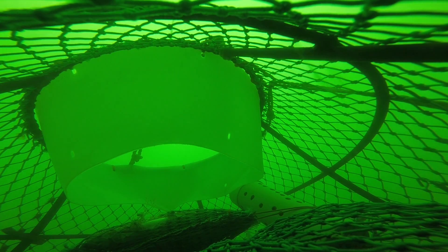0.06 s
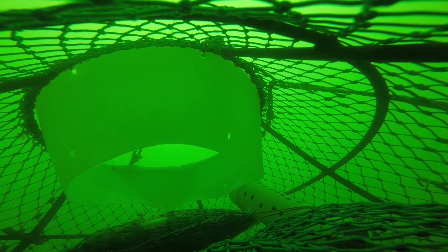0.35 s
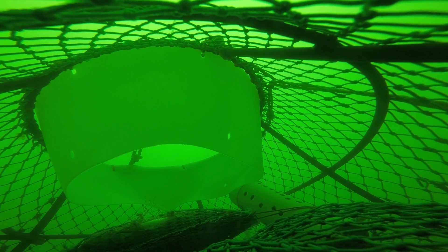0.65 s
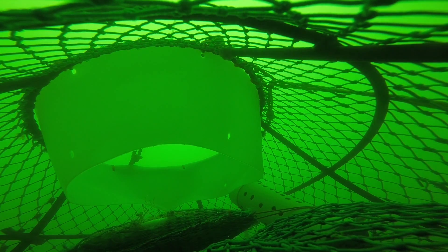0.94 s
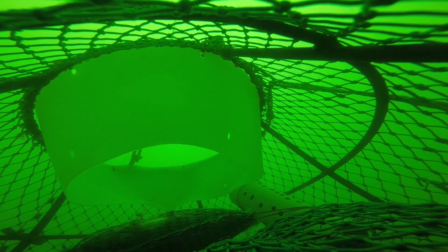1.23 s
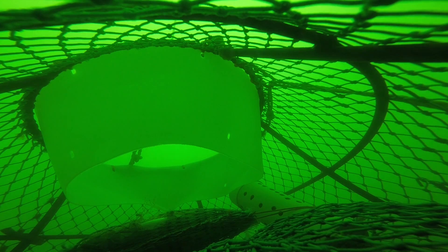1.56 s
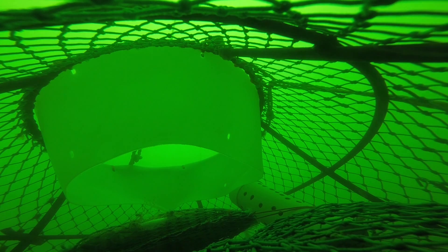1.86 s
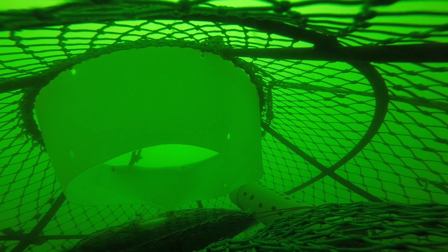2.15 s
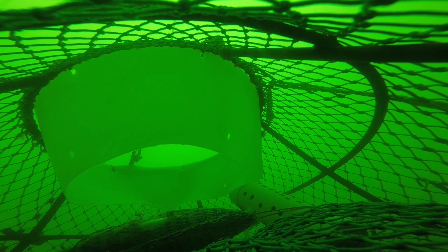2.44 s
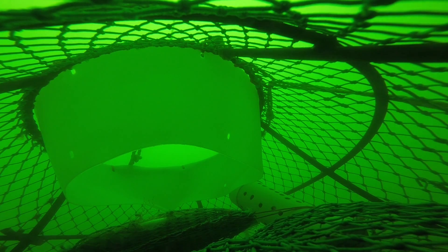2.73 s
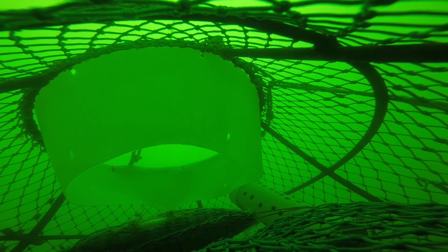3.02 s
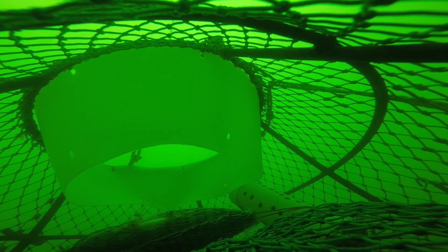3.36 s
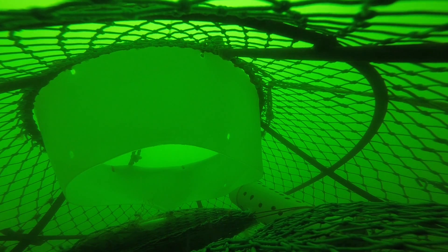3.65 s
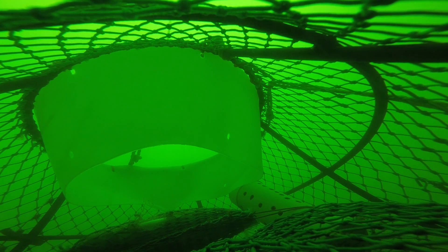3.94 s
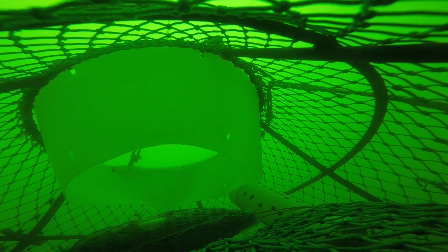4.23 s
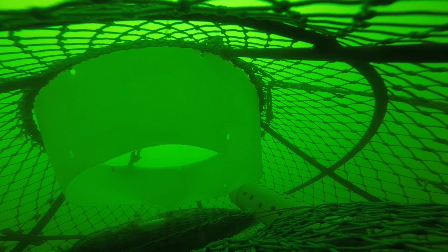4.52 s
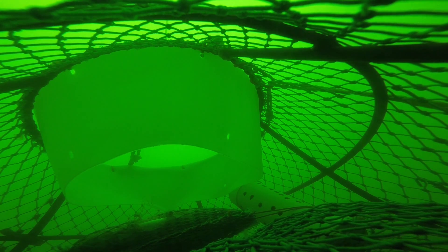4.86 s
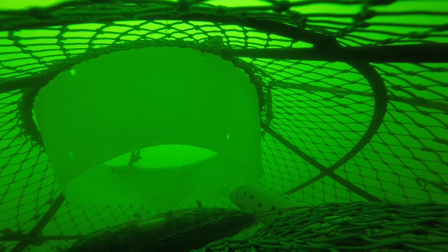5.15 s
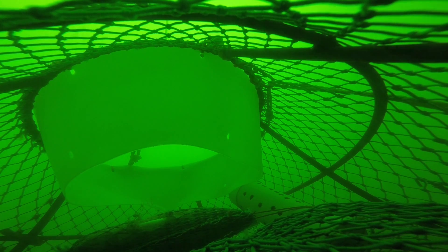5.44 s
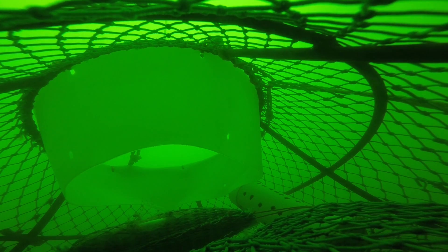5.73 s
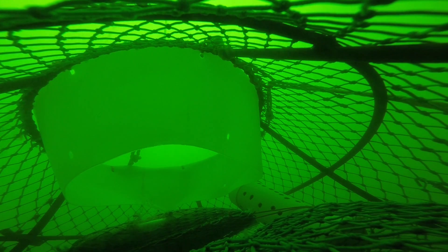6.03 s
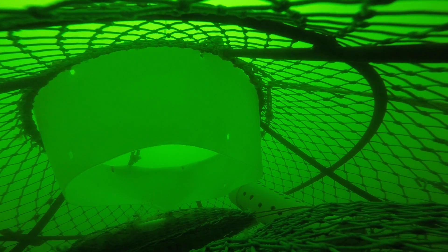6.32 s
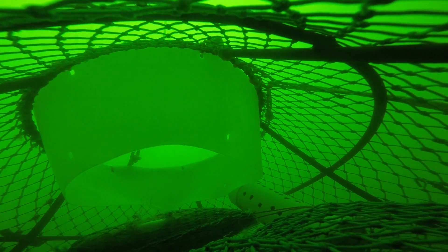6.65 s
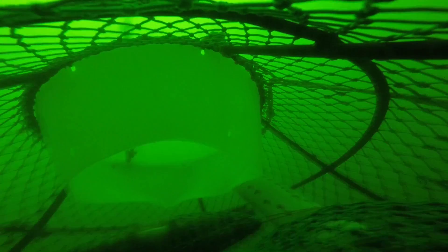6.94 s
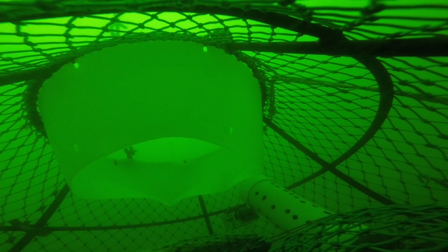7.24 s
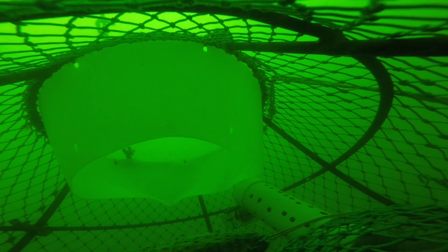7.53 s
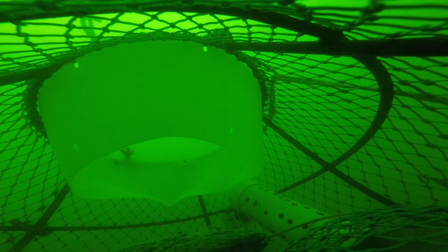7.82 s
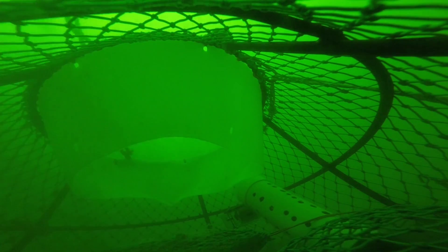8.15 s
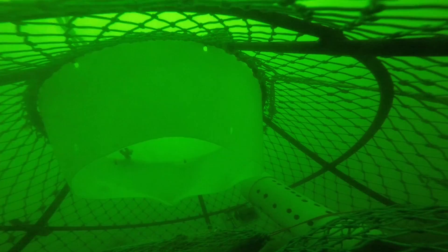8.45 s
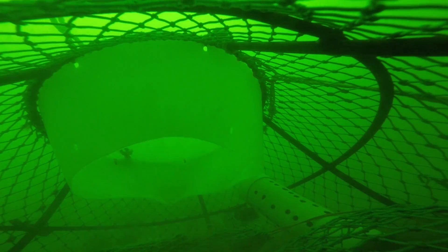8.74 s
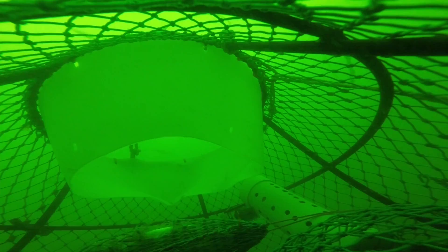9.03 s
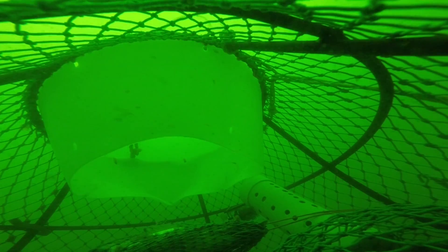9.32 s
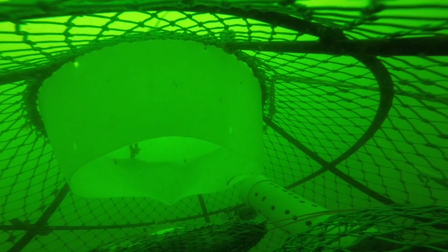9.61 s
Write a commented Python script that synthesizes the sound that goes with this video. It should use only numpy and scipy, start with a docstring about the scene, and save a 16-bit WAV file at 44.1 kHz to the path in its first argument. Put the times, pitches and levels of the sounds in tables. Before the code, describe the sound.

A boat engine idles underwater with a rapid knocking rattle, until a fish trap jolts with scrapes and thumps, leaving dull churning.

```python
"""An idling boat engine knocks twice a shaft turn, heard under water from inside a fish trap.
Its slack drive strikes and rebounds, and dispersion in shallow water draws each knock into a short
falling chirp. Beneath lie the throb of the shaft, machinery drones, hull rumble and propeller wash.
Near 7 s the trap jolts: its mesh scrapes, squeaks and snaps taut, and blows ring the frame.
The knocking stops, and a dull churning runs on until the sound cuts off."""
import sys
import numpy as np
from scipy import signal
from scipy.fft import rfft, irfft, next_fast_len
from scipy.io import wavfile

SR = 44100
rng = np.random.default_rng(int(sys.argv[2]) if len(sys.argv) > 2 else 0)


def transcribe(u):
    """Save the signal u as a 16-bit wav file named by the first command-line argument.

    u: samples, shape (n,) or (channels, n), limited to [-1, 1]; the rate is SR.
    q: integer samples, one column per channel.
    """
    v = np.clip(np.atleast_2d(u).T, -1, 1)
    q = np.round(v * 32767).astype(np.int16)
    wavfile.write(sys.argv[1], SR, q)


N = 426888
TIME = np.arange(N) / SR


def gain_of(db):
    """The decibel law: amplitude grows tenfold every 20 dB."""
    return 10 ** (np.asarray(db) / 20)


def unit_rms(x):
    """Normalisation to an rms of 1."""
    return x / np.sqrt(np.mean(x ** 2) + 1e-20)


def spectrum(points, hz):
    """Interpolation of levels on a logarithmic frequency axis."""
    f, db = np.transpose(points)
    return np.interp(np.log(hz + 1), np.log(f + 1), db)


def ripple(bands, hz):
    """Lorentzian peaks and dips, summed in dB."""
    return sum(db / (1 + (2 * (hz - f) / width) ** 2) for f, width, db in bands)


def follow(rows, t):
    """Linear interpolation in time of each column of a table."""
    s, *columns = np.transpose(rows)
    return [np.interp(t, s, column) for column in columns]


def add(mix, s, sound):
    """Superposition of a sound starting at time s."""
    part = mix[max(0, round(s * SR)):][:len(sound)]
    part += sound[:len(part)]


def coloured(x, colour, bands=()):
    """Spectral shaping by a broad envelope and narrow bands, at rms 1."""
    size = next_fast_len(len(x), True)
    grid = np.linspace(0, SR / 2, 8193)
    gain = gain_of(spectrum(colour, grid) + ripple(bands, grid))
    shaped = rfft(x, size) * np.interp(np.fft.rfftfreq(size, 1 / SR), grid, gain)
    return unit_rms(irfft(shaped, size)[:len(x)])


def wander(hz, t=TIME):
    """Random modulation of rms 1, with hz new values a second."""
    return unit_rms(np.interp(t * hz, np.arange(4096), rng.standard_normal(4096)))


def rough_noise(depth_db, hz, t=TIME):
    """White noise under random amplitude modulation."""
    return rng.standard_normal(len(t)) * gain_of(depth_db * wander(hz, t))


def resonate(x, hz, width_hz):
    """A resonance of unit gain whose centre follows the curve hz."""
    carrier = np.exp(2j * np.pi * np.cumsum(hz) / SR)
    pole = np.exp(-np.pi * width_hz / SR)
    return 2 * (carrier * signal.lfilter([1 - pole], [1, -pole], x / carrier)).real


def minimum_phase(db):
    """The Hilbert relation gives the causal response with this gain."""
    log_gain = np.log(gain_of(np.r_[db, db[-2:0:-1]]))
    return np.exp(np.conj(signal.hilbert(log_gain)))[:len(db)]


# Churning before and after the jolt: t/s, rumble level/dB, wash level/dB
CHURN = [(0, -31.5, -40), (1.3, -30, -39), (2.8, -28.5, -35.5), (4, -29, -40.5), (5, -29.5, -40),
         (5.6, -27.5, -39), (6.8, -29, -38)]
CHURN_AFTER = [(7.25, -36.5, -43), (7.36, -42.5, -41.5), (7.5, -34, -39), (7.75, -31.5, -34),
               (8.3, -32, -34.5), (8.94, -33.5, -36.5)]
# Spectra of hull rumble and propeller wash, before and after: f/Hz, level/dB
RUMBLE = [(10, -20.5), (32, -4.5), (47, -7.5), (62, -24), (90, -7.5), (150, -2.5), (215, 0), (270, -1.5),
          (330, -7.5), (470, -8), (600, -11.5), (1000, -15), (2000, -56)]
RUMBLE_AFTER = [(10, -17), (40, -13.5), (85, -15.5), (130, 0.5), (200, -5), (280, -0.5), (340, -10),
                (550, -12.5), (750, -20.5), (1000, -18), (2000, -52)]
WASH = [(500, -7.5), (1100, -3.5), (1430, 1.5), (1900, -3.5), (2300, -3.5), (2800, -25.5), (3700, -23),
        (5200, -25), (6600, -23.5), (8300, -37.5), (14500, -48), (16000, -74.5)]
WASH_AFTER = [(500, -11.5), (1250, -6), (1480, 4.5), (1600, 0.5), (1665, -15.5), (1790, 0.5), (2600, -14),
              (3700, -16.5), (5300, -24.5), (6700, -21.5), (8200, -29.5), (10000, -40), (14700, -46.5),
              (16000, -83)]
# Resonances and dead bands of a camera housing in the trap: f/Hz, width/Hz, gain/dB
HOUSING = [(1500, 77, 5.5), (1531, 130, -12.5), (2070, 100, -2), (2475, 161, 7.5), (2541, 235, -23.5),
           (2574, 178, 15.5), (3240, 130, -2), (3480, 340, 8), (3850, 300, -2.5), (4920, 180, -5),
           (7250, 400, -8.5), (10950, 340, -5), (12300, 600, -11.5)]
# Hollows in the wash once the trap has settled: f/Hz, width/Hz, gain/dB
HOLLOWS = [(3240, 150, -5.5), (3670, 300, 2.5), (4140, 130, -2.5), (5330, 220, -6.5), (8050, 400, -4),
           (13600, 900, -2), (16050, 1530, -16)]

def churning(curve, rumble, wash, bands, rumble_db, wash_db, grain_db=3.5):
    """Modulated noise: the hull radiates engine rumble and the propeller stirs up bubbles."""
    low_db, high_db = follow(curve, TIME)
    hull = coloured(rough_noise(depth_db=3.03, hz=60), rumble)
    flutter_db = 1.1 * wander(90)
    noise = rng.standard_normal(N)
    spikes_db = grain_db * np.minimum(rng.exponential(1, N), 6)
    bubbles = coloured(noise * gain_of(spikes_db + flutter_db), wash, bands)
    return gain_of(low_db + rumble_db) * hull + gain_of(high_db + wash_db) * bubbles


# Climbing interference notches, one table each: t/s, f/Hz, depth (0-1)
NOTCHES = [
    [(0, 665, 0.15), (1, 910, 1), (2, 1100, 0.7), (2.6, 1310, 0.3)],
    [(1.8, 440, 0), (2.7, 554, 0.46), (3.5, 750, 0.75), (4.5, 1090, 0.9), (5.5, 1210, 0.2)],
]
# Centre of the engine's boom: t/s, f/Hz
BOOM = [(0, 220), (1.5, 233), (3, 241), (4, 174), (6.8, 192)]

def shallows(x, boom_gain=0.66):
    """Multipath interference: as the boat moves, the water cancels some bands and lifts a low one."""
    for rows in NOTCHES:
        hz, depth = follow(rows, TIME)
        x = x - np.clip(depth, 0, 1) * resonate(x, hz, width_hz=220)
    return x + boom_gain * resonate(x, follow(BOOM, TIME)[0], width_hz=70)


def swell(level_db=-38):
    """Forced resonance: propeller wash rises and falls in two modes of the trap."""
    envelope = np.interp(TIME, [3.5, 3.95, 4.3, 4.7], [0.27, 1, 1, 0.26])
    response = [(700, -42), (1200, -16.5), (1450, 8.5), (1680, -10), (1950, 2), (2200, -12.5),
                (2800, -34), (6000, -37)]  # f/Hz, level/dB
    return gain_of(level_db) * envelope * coloured(rough_noise(depth_db=2, hz=60), response)


# Machinery tones before and after the jolt: f/Hz, relative level/dB
DRONE = [(114, -1.5), (151, 3), (352, -8), (470, -6.5), (479, -10.5), (550, -12.5)]
DRONE_AFTER = [(115, -3.5), (167, -0.5), (203, 4), (270, -1), (532, -10.5), (862, -9)]

def drone(lines, curve, level_db, waver, flutter_db=3):
    """A line spectrum: machinery tones waver by a share of their pitch and follow the rumble's level."""
    t, tones = TIME[::8], 0
    for hz, db in lines:
        amplitude = gain_of(db + flutter_db * wander(10, t))
        cycles = np.cumsum(hz * (1 + waver * wander(20, t))) * t[1]
        tones += amplitude * np.sin(2 * np.pi * cycles)
    return gain_of(level_db + follow(curve, TIME)[0]) * np.interp(TIME, t, tones)


# Engine orders: multiple of the shaft speed, relative level/dB
ORDERS = [(1, -4.5), (2, -0.5), (3, 1.5), (4, -13.5), (5, -5), (6, -3), (7, 3.5), (8, 4.5), (9, 2),
          (10, -2)]

def throb(turns, level_db=-13):
    """Harmonics of the shaft's rotation, each wavering in amplitude and phase."""
    t, harmonics = TIME[::8], 0
    for order, db in ORDERS:
        amplitude = gain_of(db) * (1 + .3 * wander(7, t))
        phase = 2 * np.pi * (order * turns[::8] + rng.random()) + .4 * wander(4, t)
        harmonics += amplitude * np.sin(phase)
    return gain_of(level_db + follow(CHURN, TIME)[0]) * np.interp(TIME, t, harmonics)


def mesh_hiss(level_db=-47):
    """Friction noise of the mesh: faint at first, strongest in the slide, then almost gone."""
    envelope = np.interp(TIME, [6.83, 6.85, 7.13, 7.2], [0.16, 0.95, 0.7, 0.011])
    colour = [(3000, -18.5), (5800, 11), (9000, -7), (15000, -15.5), (16000, -42)]  # f/Hz, level/dB
    return gain_of(level_db) * envelope * coloured(rng.standard_normal(N), colour)


def mesh_squeak(start_s=6.89, length_s=0.19, low_hz=2250, top_hz=2970, width_hz=400, level_db=-30):
    """Stick-slip friction of mesh on frame: pitch and strength rise and fall with the pull."""
    out, t = np.zeros(N), np.arange(0, length_s, 1 / SR)
    pull = np.sin(np.pi * t / length_s)
    hz = low_hz + (top_hz - low_hz) * pull
    slips = rough_noise(depth_db=4, hz=200, t=t)
    rub = resonate(resonate(slips, hz, width_hz), hz, width_hz)
    add(out, start_s, gain_of(level_db) * pull * unit_rms(rub))
    return out


# Course of the drag: t/s, shudder level/dB, scrape level/dB
DRAG = [(6.82, -54, -47.5), (6.85, -12, -41), (6.9, -24.5, -36.5), (6.98, -28, -46), (7.01, -29, -33.5),
        (7.07, -23.5, -32), (7.16, -28, -40.5), (7.21, -18.5, -62), (7.34, -53.5, -76)]
# Spectra of the trap's shudder and the net's scrape: f/Hz, level/dB
SHUDDER = [(10, -7), (30, -1), (85, 7.5), (150, -4), (280, 3.5), (380, -14.5), (800, -27.5), (1600, -63.5)]
SCRAPE = [(300, -18), (1100, -23.5), (1500, -2), (2300, 5), (2900, 4), (3700, -7), (4500, -13.5),
          (5800, -11), (9000, -26.5), (15000, -31), (16000, -60.5)]

def trap_drag(trim_db=-1):
    """Sliding friction: the dragged trap shudders and its net scrapes."""
    shudder_db, scrape_db = follow(DRAG, TIME)
    dragging = (TIME > DRAG[0][0]) & (TIME < DRAG[-1][0])
    shudder = gain_of(shudder_db) * coloured(rng.standard_normal(N), SHUDDER)
    scrape = gain_of(scrape_db) * coloured(rough_noise(depth_db=3.5, hz=400), SCRAPE)
    return gain_of(trim_db) * dragging * (shudder + scrape)


# Snaps of mesh and frame: t/s, level/dB, T60/s, f/Hz
SNAPS = [(6.835, -10, 0.089, 1980), (6.847, -6, 0.031, 1920), (6.854, -12, 0.08, 2280),
         (6.9462, -17.5, .025, 2770), (6.989, -4, 0.011, 3080), (6.997, -13, 0.025, 2920),
         (7.005, -21.5, 0.031, 2920), (7.055, -19.5, 0.032, 2400)]

def mesh_snaps():
    """Transient excitation: each snap to tautness is a decaying noise burst with one resonance."""
    out, t = np.zeros(N), np.arange(SR // 4) / SR
    for s, db, t60, hz in SNAPS:
        burst = coloured(rng.standard_normal(len(t)), SCRAPE)
        ring = resonate(burst, np.full(len(t), hz), width_hz=445)
        add(out, s, gain_of(db - 60 * t / t60) * unit_rms(burst + 2 * ring))
    return out


# Blows to the frame: t/s, thump level/dB, f/Hz, T60/s, ring and crunch level/dB
THUMPS = [(6.826, -11, 38, 0.24, -28), (6.854, -6, 96.3, 0.055, -21), (6.986, -13.5, 165, .07, -30.5),
          (7.053, -17, 55, .13, -28), (7.176, 2.5, 153, 0.05, -13), (7.215, -10.5, 141, 0.053, -40.5)]
# Modes of the frame: f/Hz, relative level/dB, T60/s
FRAME_MODES = [(525, -11, 0.16), (727, -21, .1), (885, -8, 0.15), (1430, 2, 0.075), (1930, -18, 0.12),
               (2090, -7, 0.088), (2480, -5.5, 0.088), (2520, -21, .08), (3009, -12, .08),
               (3370, -10.5, .06)]
# Spectrum of a blow's crunch: f/Hz, level/dB
CRUNCH = [(200, 1), (900, -1.5), (1500, 4), (2300, -4), (3400, -16.5), (4500, -29), (7000, -36.5),
          (15000, -60.5)]

def frame_thumps(modes_db=-4, crunch_db=3, crunch_t60=0.06, push_delay_s=.006, rise_s=0.02):
    """Damped free vibration: blows crunch, ring the frame's modes and set the housing swinging."""
    out, t = np.zeros(N), np.arange(SR // 4) / SR
    attack = np.minimum(t / 0.0022, 1)
    for s, db, hz, t60, ring_db in THUMPS:
        modes = sum(gain_of(mode_db - 60 * t / mode_t60) * np.sin(2 * np.pi * (f * t + rng.random()))
                    for f, mode_db, mode_t60 in FRAME_MODES)
        crunch = gain_of(crunch_db - 60 * t / crunch_t60) * coloured(rng.standard_normal(len(t)), CRUNCH)
        add(out, s, gain_of(ring_db) * attack * (gain_of(modes_db) * modes + crunch))
        # the heavy housing starts to swing a moment after the blow
        swing = np.minimum(t / rise_s, 1) * gain_of(db - 60 * np.maximum(t - rise_s / 2, 0) / t60)
        add(out, s + push_delay_s, -swing * np.sin(2 * np.pi * hz * t))
    return out


# Spectrum of a knock, early and late: f/Hz, level/dB
KNOCK_EARLY = [(530, -51.5), (1050, -17), (1350, 4.5), (1900, 4), (2700, -8.5), (3600, -6), (4400, -13),
               (5000, -25.5), (6250, -12), (8000, -18.5), (10200, -23), (12000, -34.5), (14500, -42),
               (16000, -69.5)]
KNOCK_LATE = [(530, -45.5), (1080, -14.5), (1350, 1.5), (1900, 5), (2400, -2), (3050, -10.5), (4350, -11.5),
              (5000, -23), (6300, -16.5), (8300, -24.5), (9400, -37.5), (12000, -37.5), (14700, -57),
              (16000, -68)]
# Resonances that come and go as the boat moves: f/Hz, width/Hz, gain/dB
RINGS_EARLY = [(2698, 180, 14.5), (2370, 180, 2)]
RINGS_LATE = [(3072, 160, 7), (1938, 205, -10.5)]
# Ping of the hard knocks: f/Hz, width/Hz, gain/dB
PING = [(2346, 180, 6), (1430, 160, -4.5), (3350, 590, -5)]
# Course of the ping: t/s, share (0-1)
PING_SHARE = [(1.5, 0.83), (2.3, 1), (3.4, 0.95), (5, 0.65), (6, 0.15)]

def knock_colour(s, hz, level_db, treble_db, face, cutoff_hz):
    """Filters in cascade add in dB: struck face, housing and the low cutoff of the shallow channel."""
    lateness = np.interp(s, [1.4, 3.9], [0, 1])
    early = spectrum(KNOCK_EARLY, hz) + ripple(RINGS_EARLY, hz)
    late = spectrum(KNOCK_LATE, hz) + ripple(RINGS_LATE, hz)
    colour = (1 - lateness) * early + lateness * late + ripple(HOUSING, hz) + ripple(face, hz)
    colour += treble_db * spectrum([(2800, 0.082), (6500, 0.92)], hz)
    colour -= 10 * np.log10(1 + (cutoff_hz / (hz + 100)) ** 8)
    hardness = np.clip((level_db + 28.5) / 10, 0, 1)
    colour += follow(PING_SHARE, s)[0] * 2 * rng.random() * hardness * ripple(PING, hz)
    # each blow favours a slightly different pitch
    return colour + ripple([(rng.uniform(2200, 3200), 700, rng.uniform(0, 4))], hz)


def knock(s, level_db, treble_db, face, lag_s, cutoff_hz, onset_db=-3, scatter_db=-19, size=1024):
    """Waveguide dispersion: a blow's lows lag into a falling chirp; an echo and faint scatter follow."""
    hz, t = np.fft.rfftfreq(size, 1 / SR), np.arange(size) / SR

    def burst(t60):
        """Spectrum of exponentially decaying noise."""
        return rfft(unit_rms(rng.standard_normal(size) * gain_of(-60 * t / t60))) / np.sqrt(size)

    response = minimum_phase(knock_colour(s, hz, level_db, treble_db, face, cutoff_hz))
    group_delay = lag_s * np.minimum(2 * cutoff_hz / (hz + 1), 2)
    dispersion = np.exp(-2j * np.pi * np.cumsum(group_delay) * SR / size)
    echo_gain, echo_s = rng.uniform(.25, .7), rng.uniform(.002, .0021)
    echo = echo_gain * np.exp(-2j * np.pi * hz * echo_s) / (1 + (hz / 3800) ** 4)
    # a brief bright noise burst softens each knock's onset and roughens its click
    onset_noise = gain_of(onset_db) * burst(t60=0.01) * hz / (hz + 2500)
    click = np.exp(-2j * np.pi * hz * 0.0002974) / (1 + (hz / 5000) ** 2)
    scatter = gain_of(scatter_db) * burst(t60=0.034) / (1 + (hz / 4500) ** 2)
    wave = irfft(response * dispersion * (onset_noise + click + scatter) * (1 + echo))
    return gain_of(level_db) * wave / np.linalg.norm(wave) * np.sqrt(.005 * SR)  # energy of 5 ms


# How unevenly the slack drive catches: t/s, unevenness (0-1)
UNEVENNESS = [(.9, 0), (2.3, 0.31), (4, 0.97), (5.2, 1), (5.42, 0.23), (6.7, 0.4)]

def strikes(turns, place, jitter_s=.0003, stop_s=6.825):
    """Periodic impact: the times the shaft passes one place (0-1) in its turn, and their unevenness."""
    times = TIME[1:][np.diff(np.floor(turns - place)) > 0]
    times = times[times < stop_s]
    return times + jitter_s * rng.standard_normal(len(times)), follow(UNEVENNESS, times)[0]


# Lurches of the drive: t/s, duration/s, change of main knock/dB, of its treble/dB, of rebound/dB
LURCHES = [(1.423, 0.043, -7, -11, -7), (1.5, .08, -5, -4, -7.5), (2.208, 0.077, 2.5, 0, 2),
           (2.31, .12, -7, 4, -1.5), (2.59, .07, -6.5, 5, 0), (2.861, 0.048, -10, 4, -7),
           (3.944, 0.18, -3.5, 2, 1.5), (4.921, 0.066, 1, 2.5, 10), (5.7, 0.14, -5.5, 3, -0.5),
           (6.115, 0.27, -5, 0, -0.5)]

def lurch(times):
    """Stepwise modulation: three changes in dB as the drive falters or bites for a turn or a few."""
    return sum(np.outer(change, (times > start) & (times < start + length))
               for start, length, *change in LURCHES)


# Growth of the rebound: t/s, level/dB
REBOUND = [(0, -43), (.6, -43), (.75, -32), (1.15, -26.5), (2.7, -25), (3, -31), (3.4, -26), (4.4, -23.5),
           (5.9, -20.5), (6.3, -21.5), (6.65, -16.5)]
# Resonances and hollows of the face it strikes: f/Hz, width/Hz, gain/dB
REBOUND_FACE = [(2070, 300, 3), (2480, 300, -1.5), (3120, 430, -10.5), (3900, 700, 6.5), (6130, 1800, -3)]

def rebounds(turns, force_db=3, miss_share=.28, miss_db=-38, swing_s_per_db=.0001):
    """Backlash: 0.6 turn after the main knock the drive strikes back, brighter the harder it hits."""
    out = np.zeros(N)
    times, uneven = strikes(turns, place=.855)
    force, edge = rng.standard_normal((len(times), 2)).T
    # a very uneven drive sometimes misses, leaving only a weak tap
    missed = rng.random(len(times)) < miss_share * np.interp(uneven, [.45, 1], [0, 1])
    level = follow(REBOUND, times)[0] + lurch(times)[2]
    level += force_db * np.sqrt(uneven) * force + miss_db * missed
    hardness_db = level + 20
    treble = -2 + 0.37 * hardness_db + edge
    landings = times + swing_s_per_db * hardness_db  # a harder rebound has swung further
    for s, level_db, treble_db in zip(landings, level, treble):
        add(out, s, knock(s, level_db, treble_db, REBOUND_FACE, lag_s=.0013, cutoff_hz=1550))
    return out


# The main knock when it lands squarely: t/s, level/dB, treble tilt/dB
SQUARE_KNOCK = [(0, -11.5, 0.5), (.8, -12, 4), (1.15, -14.5, 5), (1.4, -13.5, 7.5), (1.72, -13, -2.5),
                (1.88, -13, 6), (1.98, -11.5, 8), (2.04, -14.5, -2), (2.7, -12, -4), (3.2, -14.5, -2),
                (5.4, -17, -3.5), (6.3, -15, 3.5), (6.65, -14.5, 2)]
# Resonances and hollows of the face it strikes: f/Hz, width/Hz, gain/dB
MAIN_FACE = [(1570, 110, -3), (2745, 510, 3), (3246, 190, 3), (6210, 600, -0.5)]

def main_knocks(turns, alternation=0.41, glance_db=-10.5, glance_treble_db=12.5):
    """Impact in a slack drive, once a turn: square blows tend to alternate with weak, thin glances."""
    out = np.zeros(N)
    times, uneven = strikes(turns, place=.254)
    chance, force, edge = rng.standard_normal((len(times), 3)).T
    rocking = unit_rms(signal.lfilter([1], [1, alternation], chance))
    glance = uneven * np.clip(rocking, 0, 1)
    level, treble = follow(SQUARE_KNOCK, times) + lurch(times)[:2]
    level += glance_db * glance + 0.66 * force
    treble += glance_treble_db * glance + 0.25 * edge
    for s, level_db, treble_db in zip(times, level, treble):
        add(out, s, knock(s, level_db, treble_db, MAIN_FACE, lag_s=0.000814, cutoff_hz=1150))
    return out


# Rotation rate of the shaft: t/s, f/Hz
SHAFT_SPEED = [(0.0, 24.84), (0.35, 24.551), (1.3, 25.983), (2.0, 25.626), (2.15, 25.919), (3.0, 25.355),
               (4.15, 25.956), (4.3, 26.348), (4.7, 26.277), (5.7, 26.42), (5.9, 26.968), (6.4, 26.188),
               (6.83, 28.906)]

def scene(jolt_s=6.85, crossfade_s=.3):
    """Superposition of knocks and jolt on a background that crossfades to the settled churning."""
    turns = np.cumsum(follow(SHAFT_SPEED, TIME)[0]) / SR
    running = shallows(churning(CHURN, RUMBLE, WASH, HOUSING, rumble_db=-5.5, wash_db=0))
    running += throb(turns) + swell() + drone(DRONE, CHURN, level_db=-13.5, waver=.009)
    settled = churning(CHURN_AFTER, RUMBLE_AFTER, WASH_AFTER, HOLLOWS, rumble_db=-4.5, wash_db=-6.5)
    settled += drone(DRONE_AFTER, CHURN_AFTER, level_db=-10.5, waver=.02)
    knocking = main_knocks(turns) + rebounds(turns)
    jolt = trap_drag() + mesh_snaps() + frame_thumps() + mesh_squeak() + mesh_hiss()
    after = np.clip((TIME - jolt_s) / crossfade_s, 0, 1)
    return ((1 - after) * running + after * settled + jolt + knocking)[None]


def record(dry, end_s=8.946, edge_hz=16000):
    """Soft saturation near full scale, an abrupt stop and a low-pass band limit."""
    saturated = dry / (1 + dry ** 4) ** .25
    gate = np.clip((end_s - TIME) / .003, 0, 1)
    lowpass = signal.firwin(511, edge_hz, window=("kaiser", 9), fs=SR)
    return signal.oaconvolve(saturated * gate, lowpass[None], "same")


dry = scene()
out = record(dry)
transcribe(out)
```